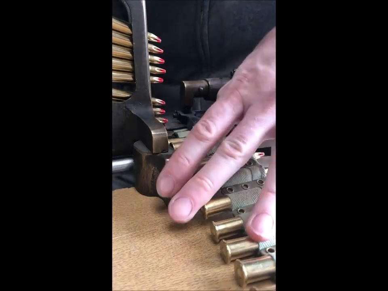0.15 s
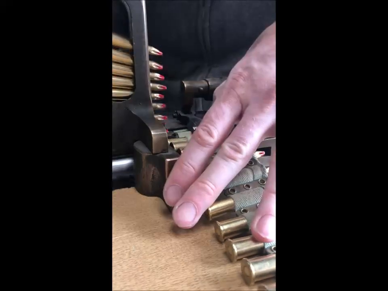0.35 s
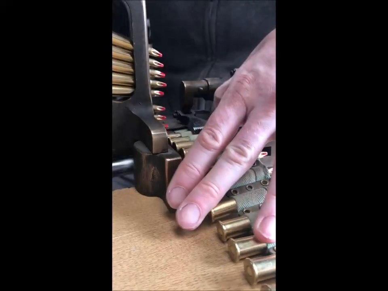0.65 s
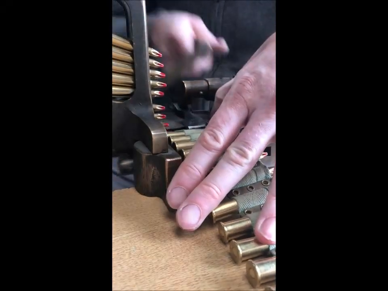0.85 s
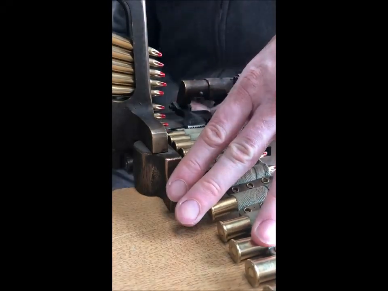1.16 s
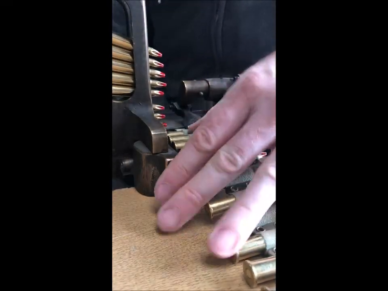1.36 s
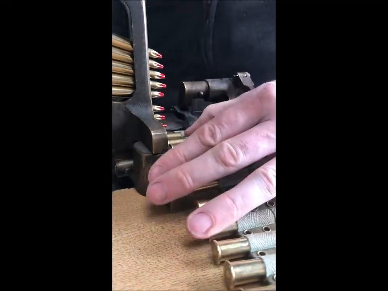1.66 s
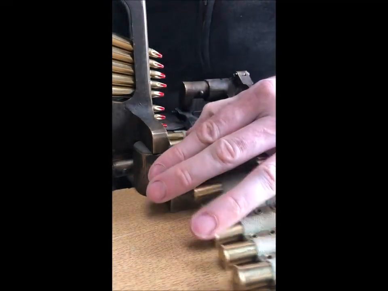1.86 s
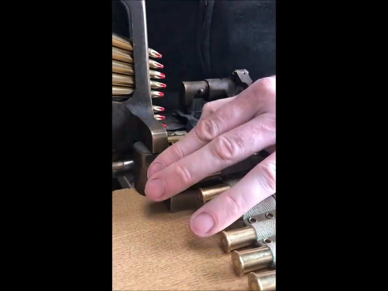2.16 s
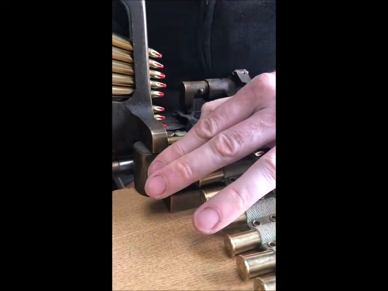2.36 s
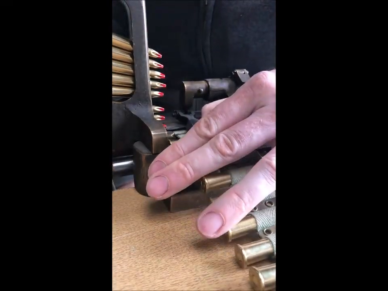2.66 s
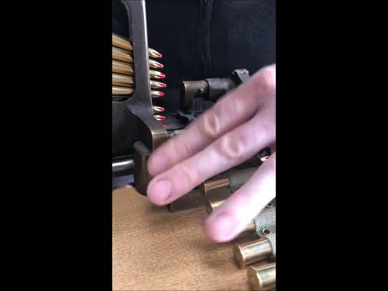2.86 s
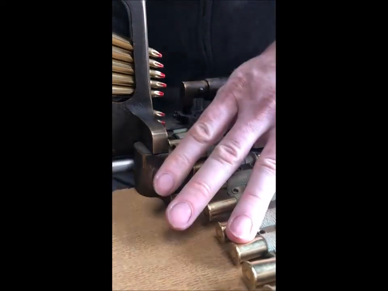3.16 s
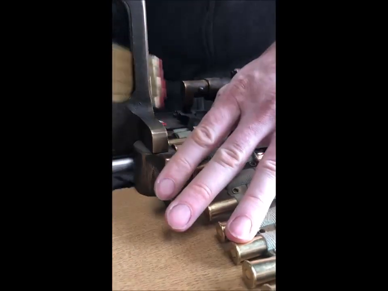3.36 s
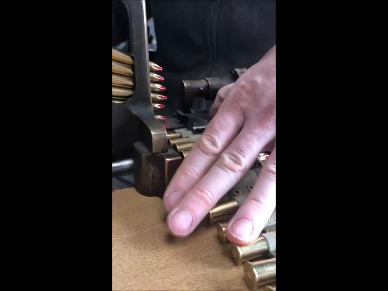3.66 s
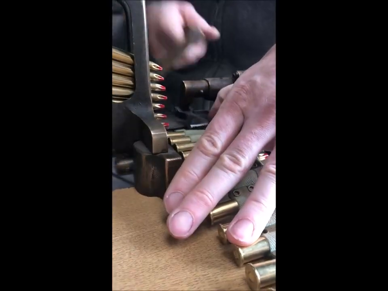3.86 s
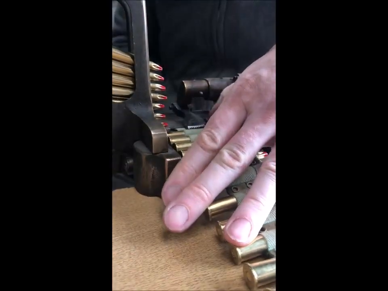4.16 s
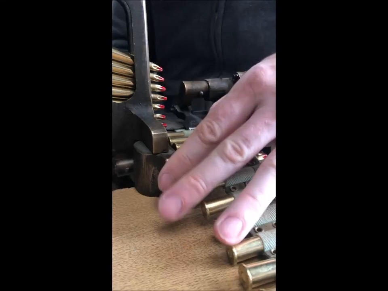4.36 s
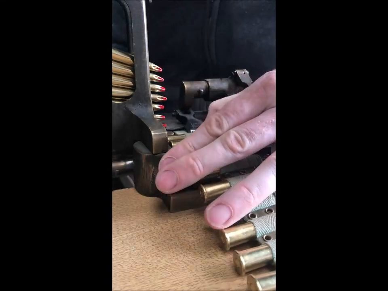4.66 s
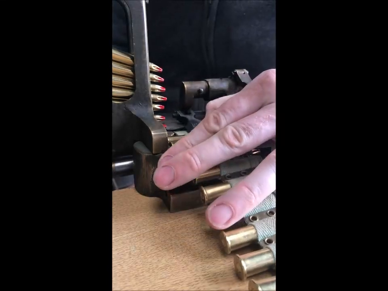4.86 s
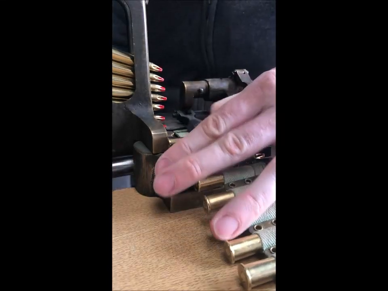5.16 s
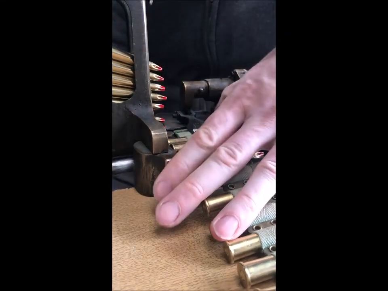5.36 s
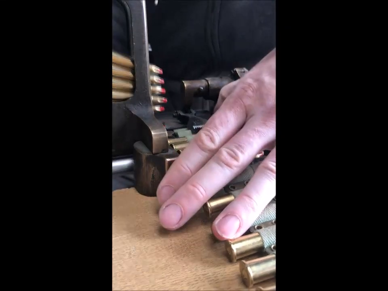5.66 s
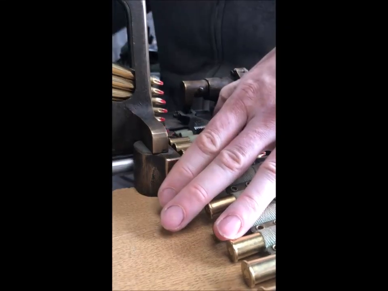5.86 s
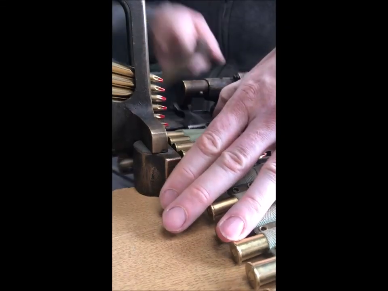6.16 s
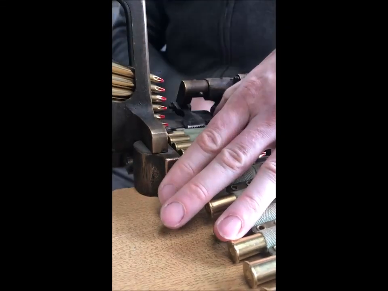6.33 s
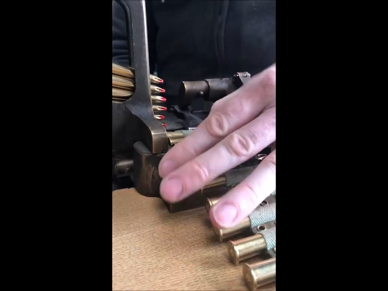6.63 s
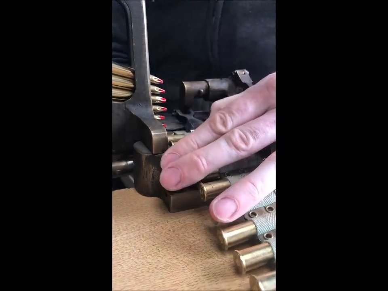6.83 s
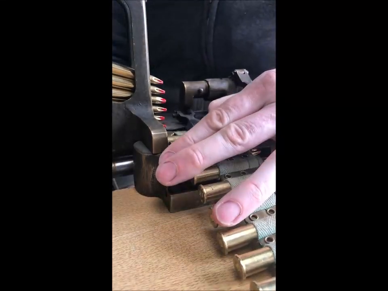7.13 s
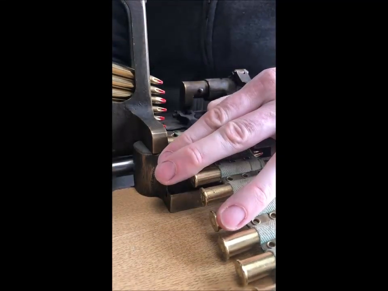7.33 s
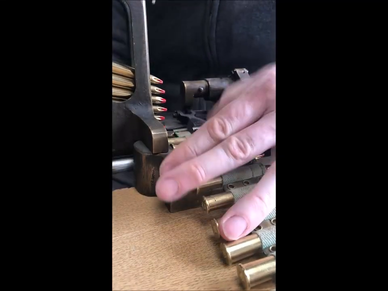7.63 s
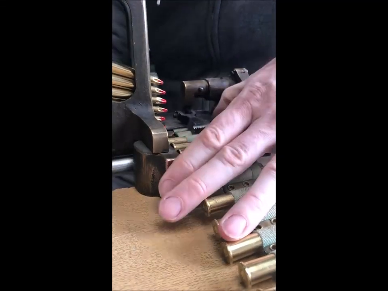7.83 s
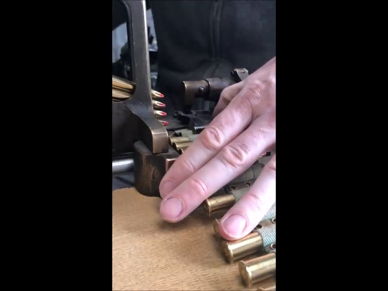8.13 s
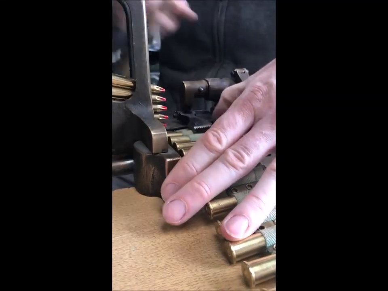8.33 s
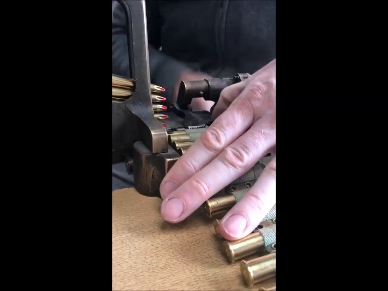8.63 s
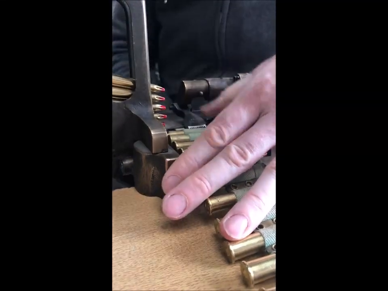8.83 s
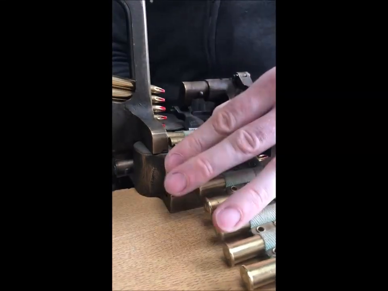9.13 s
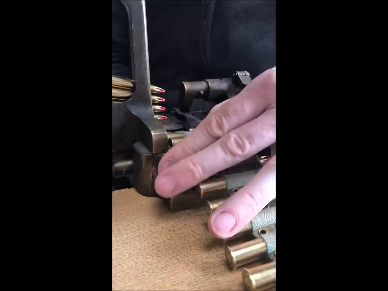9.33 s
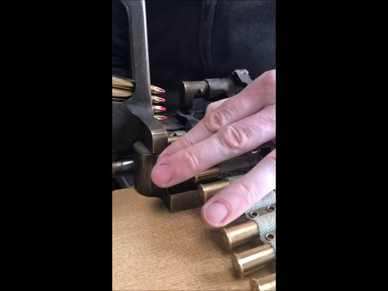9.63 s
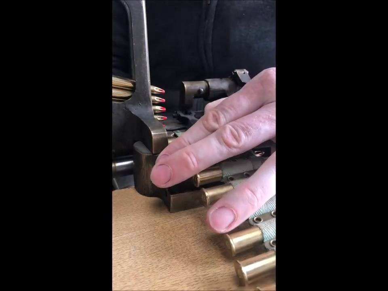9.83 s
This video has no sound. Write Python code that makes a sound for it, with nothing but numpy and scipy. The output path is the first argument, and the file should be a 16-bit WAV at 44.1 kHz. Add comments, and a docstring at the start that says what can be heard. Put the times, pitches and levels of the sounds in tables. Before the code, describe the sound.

A phone lying close on the shaking table picks up four uneven crank turns. Each begins with a grip and a steel click, then a bright cascade of brass clinks, a grinding rattle, and a hard dry metallic latch. Belt taps, brief canvas rubs and dull wood knocks trail off into near silence. Small room, short dull reflections, soft low background hush.

```python
"""Hand-cranked cartridge loader on wood

Small room, loader clamped to a wooden table, a phone lying close by on the shaking top.
Every turn of the crank pushes brass cartridges into a canvas belt: steel pawls snap, cases clink and drop
down the chute, the filled belt taps and drags on the wood. Noise shaped as contact drives resonances
of brass, steel, belt and table; decaying sines add the separate blows; filtered noise is the hush."""
import sys
import numpy as np
from scipy import signal
from scipy.fft import rfft, irfft, next_fast_len
from scipy.io import wavfile

SR = 44100
rng = np.random.default_rng(int(sys.argv[2]) if len(sys.argv) > 2 else 0)


def inscribe(sig):
    """Save sig as 16-bit PCM at rate SR to the path in sys.argv[1].

    A 1-D sig is mono; a 2-D sig holds one channel per row.
    Samples are clipped to [-1, 1] before scaling.
    """
    pcm = np.round(np.clip(np.atleast_2d(sig).T, -1, 1) * 32767)
    wavfile.write(sys.argv[1], SR, pcm.astype(np.int16))


N = 440559
TIME = np.arange(N) / SR  # s

# All levels in the tables are relative; the layers and the microphone weight them further.
# hush of room and microphone, shape of its spectrum: (frequency [Hz], level [dB])
HUSH_SPECTRUM = [(24, -28.5), (40, 3.5), (185, -4.5), (467, -18.5), (1210, -20.5), (2910, -28.5),
                 (12100, -38), (16000, -49.5)]
# resonances of the table top: (frequency [Hz], width [Hz], level [dB])
TABLE_MODES = [(79, 27, 2.5), (144.6, 16, 1), (213, 26, -4), (331, 43, -2), (404, 40, -12.5),
               (714, 260, -10.5)]
# knocks into the table top: (time [s], level [dB], pitch of the blow [Hz])
KNOCKS = [(0.209, -29, 87), (0.365, -24, 354.8), (0.685, -20, 323), (1.207, -19.5, 207), (1.883, -25, 72),
          (2.553, -27, 330), (3.16, -23.5, 87), (3.684, -23, 154), (4.198, -15, 153), (4.373, -27.5, 364),
          (5.288, -29.5, 330), (5.669, -23, 74.4), (6.031, -21.5, 130), (6.418, -17, 215), (6.581, -21, 73),
          (8.258, -24.5, 134.5), (8.792, -15, 213), (8.954, -28.5, 202), (9.087, -24, 134),
          (9.159, -31.5, 153), (9.492, -32, 152.4)]
# resonances of belt, wood and frame: (frequency [Hz], width [Hz], level [dB])
BELT_MODES = [(650, 400, -4), (950, 160, -2), (1240, 110, 0), (1750, 300, -4), (2280, 200, -2)]
# belt and frame tap the wood: (time [s], level [dB], pitch of the tap [Hz])
TAPS = [(0.135, -29.5, 1900), (0.376, -19, 2160), (0.571, -26, 1870), (0.677, -32, 685),
        (1.201, -32.5, 787), (1.314, -31.5, 1300), (1.388, -11.5, 1140), (1.447, -40.5, 883),
        (1.867, -25.5, 1600), (2.542, -32, 1260), (3.026, -30.5, 1175), (3.295, -33, 1940),
        (3.688, -26, 1930), (4.198, -25, 760), (4.365, -33.5, 607), (5.252, -23, 1259), (5.29, -22, 1180),
        (6.014, -32, 1215), (6.421, -26, 750), (6.573, -25.5, 880), (7.495, -34, 814), (7.599, -23, 1160),
        (7.83, -26.5, 1830), (8.255, -23.5, 1890), (8.787, -27, 1563), (8.943, -30.5, 902),
        (9.089, -26, 698), (9.179, -33.5, 1110), (9.266, -41, 1030), (9.287, -34, 973), (9.482, -36, 1504)]
# the belt slides over the wood: (middle [s], quarter of its length [s], level [dB])
RUBS = [(1.466, 0.034, -42.5), (1.585, 0.013, -50), (1.957, 0.03, -45.5), (2.591, 0.032, -50),
        (4.393, 0.035, -47.5), (4.959, 0.05, -49), (6.81, 0.068, -54.5)]
# resonances of the clamped steel: (frequency [Hz], width [Hz], level [dB])
STEEL_MODES = [(2850, 530, -2), (4250, 500, 1.5), (5440, 640, 0), (6570, 660, 2), (8400, 300, -5.5),
               (9700, 220, -5), (12100, 880, -5), (13330, 3000, -3)]
# snaps of the steel pawls and slide: (time [s], level [dB], pitch of the snap [Hz])
SNAPS = [(.8815, -22.5, 5330), (6.222, -25, 6370), (8.47, -22, 4640), (0.1373, -12.5, 11800),
         (0.306, -23, 6340), (0.676, -14, 5340), (0.855, -20.5, 4740), (0.9014, -3, 4120),
         (1.2063, -17.5, 4200), (1.213, -11.5, 12650), (1.2915, -39, 4530), (1.3106, -23, 6910),
         (1.4182, -27, 2780), (1.5444, -33, 2350), (1.5788, -32, 2300), (1.677, -41, 2430),
         (1.7215, -42, 3730), (1.8753, -15.5, 6060), (1.8847, -15.5, 6050), (1.956, -29, 5350),
         (2.5439, -27, 4120), (3.055, -29, 7220), (3.133, -25, 6400), (3.3007, -17.5, 4160),
         (3.5668, -17.5, 5000), (3.8526, -26.5, 6240), (3.908, -25, 5000), (3.9628, -6, 4180),
         (4.1722, -31, 3130), (4.204, -12, 6580), (4.251, -29, 4180), (4.2745, -20.5, 2800),
         (4.344, -28, 2710), (4.366, -24.5, 3250), (4.38, -26.5, 6590), (5.2472, -27, 2230),
         (5.449, -21.5, 4570), (5.6585, -10, 12840), (5.677, -9, 6470), (5.9067, -26, 6520),
         (6.1918, -20, 6960), (6.2422, -2.5, 3970), (6.2486, -5.5, 6200), (6.4178, -16.5, 6600),
         (6.5116, -11, 6670), (6.554, -22.5, 2690), (6.6234, -29, 9830), (7.2386, -36, 2210),
         (7.3445, -36, 2370), (7.444, -34, 2440), (7.5762, -28, 6700), (7.8353, -11, 12700),
         (7.885, -7.5, 6960), (7.9014, -9.5, 6870), (8.4962, -12, 4200), (8.7693, -30.5, 4580),
         (8.7967, -10, 6740), (8.9434, -23, 2700), (8.9845, -37, 4390), (9.0868, -25.5, 6240),
         (9.1537, -19, 3740), (9.2537, -40.5, 6370), (9.3566, -37.5, 3640), (9.4566, -40.5, 3180),
         (9.4818, -36.5, 2450)]
# ringing modes of a brass case: (frequency [Hz], level [dB])
BRASS_MODES = [(1280, -18), (3650, -16), (4555, -10), (4835, -11), (6293, -8), (6480, -1), (6998, -8),
               (8213, -12), (9270, -9), (9455, -7), (11020, -13), (12490, -8), (12565, -4), (13695, -12),
               (14805, -13), (15180, -8), (15470, -8)]
# cases in the stack strike each other: (time [s], level [dB])
CLINKS = [(0.321, -14), (0.531, -11), (0.559, -17), (0.573, -12), (0.612, -16), (0.634, -17), (0.6447, -22),
          (0.6871, -11), (3.1579, -22), (3.3338, -21.5), (3.3617, -15.5), (3.387, -21), (3.406, -16.5),
          (3.579, -11.5), (3.599, -10), (3.6248, -16), (3.677, -16), (3.688, -7.5), (3.7719, -18.5),
          (5.726, -21), (5.9261, -13.5), (5.939, -12), (5.981, -17), (6.014, -22.5), (6.035, -19),
          (6.0477, -9), (6.116, -17), (6.144, -18.5), (6.4264, -17), (7.939, -25), (7.9858, -10),
          (8.1148, -17), (8.1579, -14), (8.186, -18), (8.199, -17), (8.21, -17), (8.228, -14.5),
          (8.2686, -14.5), (8.332, -25)]
# a case drops onto the stack and rings freely:
# (time [s], level [dB], t60 of the chatter [s], push on the bending modes against the rest [dB])
DROPS = [(0.352, -12.5, 0.071, -14), (0.3651, -2, 0.087, -13), (0.3799, 1.5, 0.037, -7.5),
         (0.3982, -9.5, 0.084, -9), (0.4168, -11.5, 0.07, -12), (3.4407, -2, 0.13, -16.5),
         (3.4576, -7.5, 0.053, -10), (3.4918, -10.5, 0.069, -12), (5.7699, -3, 0.028, 5.5),
         (5.7818, -7.5, 0.078, 7), (5.801, -10.5, 0.09, -17), (7.995, 0.5, 0.027, 4),
         (8.001, -9, 0.21, -17)]
# one row per turn of the crank: (hand grips belt [s], load starts [s], loudest rattle [s], before the
# latch or after it, faint stir [s] and low shake [s], in either order, effort [dB])
TURNS = [(-0.1, 0.258, 0.74, 1.28, 0.9, 4), (3.054, 3.135, 3.8, 4.51, 4.45, -0.5),
         (5.3, 5.623, 6.0, 5.9, 6.5, 5.5), (7.23, 7.838, 9.2, 8.8, 9.15, 2.5)]
# the latch goes, once per turn: (time [s])
LATCH_S = [0.893, 3.9547, 6.2319, 8.4919]

# stages of every turn, before its effort: (brass rattle [dB], belt drag [dB], table shake [dB])
IDLE, GRIP, LOAD, LOUDEST = (-73.5, -78.5, -57.5), (-55.5, -56, -46.5), (-52, -53.5, -37.5), (-40, -51, -40.5)
STRAIN, STIR, LOW_SHAKE = (-46.5, -44, -31.5), (-56, -59.5, -48.5), (-66, -68, -43)
# seconds before the grip, before the latch, after the latch, after the low shake
REACH_S, STRAIN_S, REST_S, FADE_S = .1, .08, .13, .1
PULL_S = 0.012  # the load builds up this long
SLIDE_DB = (-1, 0.5, -3.5)  # what a slide adds to rattle, drag and shake, against its own level
LATCH_SNAP, LATCH_TAP = (0, 6200), (-15, 1600)  # the latch on steel and on wood: (level [dB], pitch [Hz])
# loss per octave between the pitch of a blow and a mode
KNOCK_SLOPE_DB, TAP_SLOPE_DB, SNAP_SLOPE_DB = 12, 4.5, 0.5
JOSTLE_DB = 3.2  # spread of the loose contacts between cases
BEND_HZ = 4000  # up to here the whole case bends
BRASS_T60_S, STACK_DAMPING = 0.08, 1.5  # a case touching its neighbours rings this many times shorter
HUSH_DB = -49.5  # rms of the hush before its treble stirs
ROOM_DB, ROOM_T60_S, ROOM_DULL_HZ = -14.5, 0.23, 4650
LOW_HZ, TOP_HZ = 46.4, 16000  # range of the phone


def undb(db):
    """Amplitude for a level in dB."""
    return np.exp(np.asarray(db) * np.log(10) / 20)


def level(x, db):
    """Scale a signal to an rms level in dB."""
    return x * undb(db) / np.sqrt(np.mean(x ** 2))


def flicker(spread_db, rate):
    """A gain that wanders between random levels, rate a second."""
    points = undb(spread_db * rng.standard_normal(int(rate * N / SR) + 2))
    return np.interp(TIME * rate, np.arange(len(points)), points)


def force(when, db, t60):
    """Envelope of contact: a jump at each blow that fades in its own t60, held to 2-300 ms."""
    out = np.zeros(N + SR)
    for s, size, fade in np.broadcast(when, undb(db), np.clip(t60, .002, .3)):
        t = TIME[:int(fade * SR)]
        start = int(s * SR)
        out[start:start + len(t)] += size * np.exp(-np.log(1000) * t / fade)
    return out[:N]


def jostle(size_db, t60, count):
    """Many faint contacts and a few strong ones at random moments; rms 1."""
    moments = rng.random(count) * N / SR
    sizes_db = size_db * rng.exponential(size=count)
    return level(force(moments, sizes_db, t60), 0)


def body(modes, pushes):
    """Rough contact noise rings each (Hz, width, dB) mode; a steady push of 1 gives rms near 1."""
    total = np.sqrt(sum(undb(2 * db) for _, _, db in modes))
    rough = rng.standard_normal(2 * N)
    out = 0
    for (hz, width, db), push in zip(modes, pushes):
        start = rng.integers(N)  # another stretch of noise for each mode
        contact = push * rough[start:start + N] + 1e-12
        ring = signal.lfilter(*signal.iirpeak(hz, hz / width, SR), contact)
        # a narrow mode passes less noise, so it is raised
        out = out + undb(db) / total * np.sqrt(SR / (np.pi * width)) * ring
    return out


def ping(when, db, hz, t60, rise):
    """Clean sine rings: each blow swells with time constant rise (s) and dies in t60, held to 2-300 ms."""
    out = np.zeros(N + SR)
    for s, size, f, fade in np.broadcast(when, undb(db), hz, np.clip(t60, .002, .3)):
        t = TIME[:int(fade * SR)]
        start = int(s * SR)
        swell = 1 - np.exp(-t / rise)
        decay = np.exp(-np.log(1000) * t / fade)
        out[start:start + len(t)] += size * np.sin(2 * np.pi * f * t) * swell * decay
    return out[:N]


def struck(modes, when, db, scatter_db, rise, detune):
    """Every blow rings all modes; the spot it lands on shifts their shares and pitch a little."""
    # db holds blows x modes, or one column that serves every mode
    hz, width, mode_db = np.transpose(modes)
    chance = rng.standard_normal((len(when), 2, len(modes)))
    share_db = db + mode_db + scatter_db * chance[:, 0]
    pitch = hz * (1 + detune * chance[:, 1])
    t60 = np.log(1000) / (np.pi * width)
    return ping(when[:, None], share_db, pitch, t60, rise)


def reach(db, modes, blow_hz, slope_db):
    """Level of each blow in each mode: it falls with the octaves between their pitches."""
    octaves = abs(np.log2(np.transpose(modes)[0] / blow_hz[:, None]))
    return db[:, None] - slope_db * octaves


def with_latch(blows, latch):
    """Columns of a table of blows, with one more row for the latch of each turn."""
    return np.transpose(list(blows) + [(s, *latch) for s in LATCH_S])


def slides():
    """Pressure of the belt on the wood: up and down once for each slide."""
    return sum(np.interp(TIME, (s - 2 * quarter, s, s + 2 * quarter), (0, undb(db), 0))
               for s, quarter, db in RUBS)


def work():
    """Rattle, drag and shake in dB: each turn times and orders the stages its own way; slides stir all."""
    rows = []
    for (grip, load, loudest, stir, low_shake, effort_db), latch in zip(TURNS, LATCH_S):
        stages = [(grip - REACH_S, IDLE), (grip, GRIP), (load - PULL_S, GRIP), (load, LOAD),
                  (loudest, LOUDEST), (latch - STRAIN_S, STRAIN), (latch + REST_S, IDLE),
                  (stir, STIR), (low_shake, LOW_SHAKE), (low_shake + FADE_S, IDLE)]
        rows += [(s, *(np.array(db) + effort_db)) for s, db in stages]
    s, *columns = np.transpose(sorted(rows))
    slide = slides()
    return [20 * np.log10(undb(np.interp(TIME, s, column)) + undb(db) * slide)
            for column, db in zip(columns, SLIDE_DB)]


def air():
    """Shaped noise, the hush of room and microphone; its treble stirs softly with the rustle of cloth."""
    hz, db = np.transpose(HUSH_SPECTRUM)
    size = next_fast_len(N)
    bins_hz = np.fft.rfftfreq(size, 1 / SR)
    shape = undb(np.interp(np.log(bins_hz + 1), np.log(hz), db))
    noise = irfft(rfft(rng.standard_normal(size)) * shape, size)[:N]
    hush = level(noise, HUSH_DB)
    low = signal.filtfilt(*signal.butter(1, 700, fs=SR), hush)
    return low + (hush - low) * flicker(1.5, 4) * flicker(2.0, 22)


def room(x):
    """Reflections of a small room: a dense, dull noise tail that swells over a few milliseconds."""
    t = TIME[:SR // 2]
    envelope = np.exp(-np.log(1000) * t / ROOM_T60_S) * (1 - np.exp(-t / 0.0027))
    tail = rng.standard_normal(len(t)) * envelope
    tail = signal.lfilter(*signal.butter(1, ROOM_DULL_HZ, fs=SR), tail)
    return signal.fftconvolve(x, undb(ROOM_DB) * tail / np.sqrt(np.sum(tail ** 2)))[:N]


def table(shake_db):
    """Grind and small bumps shake the top; a knock feeds mostly the modes near its own pitch."""
    when, db, blow_hz = np.transpose(KNOCKS)
    reach_db = reach(db, TABLE_MODES, blow_hz, KNOCK_SLOPE_DB)
    shake = undb(shake_db) * (.4 + .8 * jostle(2.2, .08, count=1100))  # steady grind + bumps
    pushes = (force(when, mode_db + 4, 0.19) + shake * flicker(1.7, 16) for mode_db in reach_db.T)
    rough = body(TABLE_MODES, pushes)
    return rough + struck(TABLE_MODES, when, reach_db - 4.5, 1.7, .004, detune=.015)


def belt(drag_db):
    """Taps ring wood and frame over grainy canvas drag, each with its own note; slides sing in two modes."""
    when, db, tap_hz = with_latch(TAPS, LATCH_TAP)
    drag = undb(drag_db) * jostle(2.5, 0.03, count=2500)
    reach_db = reach(db, BELT_MODES, tap_hz, TAP_SLOPE_DB)
    knocks_and_drag = body(BELT_MODES, (force(when, mode_db + 1.5, 0.024) + drag for mode_db in reach_db.T))
    song = body(BELT_MODES[2::2], (slides() * undb(share_db) * flicker(4.5, 90) for share_db in (-4, 4)))
    rough = signal.lfilter(*signal.butter(2, 3200, fs=SR), knocks_and_drag + song)
    notes = ping(when, db - 1.5, tap_hz, .02, .0006)
    return rough + notes + struck(BELT_MODES, when, db[:, None] - 4, 2.5, .0003, detune=.08)


def pawls():
    """Dry snaps of clamped steel: each has a short note, scrapes the modes and rings them."""
    when, db, snap_hz = with_latch(SNAPS, LATCH_SNAP)
    hz = np.transpose(STEEL_MODES)[0]
    reach_db = reach(db, STEEL_MODES, snap_hz, SNAP_SLOPE_DB)
    # the scrape's treble dies first; two narrow high modes ring longest
    scrapes = body(STEEL_MODES, (force(when, mode_db - 7.5, 70 / f ** 0.96) * flicker(2.3, 25)
                                 for f, mode_db in zip(hz, reach_db.T)))
    rings = struck(STEEL_MODES, when, reach_db - 5, 3.0, 0.00027, detune=0.033)
    return scrapes + rings + ping(when, db - 1.5, snap_hz, 0.014, 0.00015)


def case_modes(damping):
    """Modes of a brass case as (Hz, width, dB): damping widens them, so they ring shorter."""
    width = damping * np.log(1000) / (np.pi * BRASS_T60_S)
    return [(hz, width, db) for hz, db in BRASS_MODES]


def brass(push, low_push, damping, scatter_db):
    """Contact rings the case, its bending modes pushed apart, and cracks; the favoured modes wander."""
    modes = case_modes(damping)
    rings = body(modes, ((push if hz > BEND_HZ else low_push) * flicker(scatter_db, 30) for hz, _, _ in modes))
    crack = (push + 1e-12) * rng.standard_normal(N)
    return rings + undb(-4.0) * signal.lfilter(*signal.butter(1, 2000, "high", fs=SR), crack)


def cases(rattle_db):
    """Drops ring out; clinks and the jostle of the stack are damped and tick on the steel chute."""
    chatter = .5 + .6 * jostle(2.5, .002, count=9000)  # drops and clinks stutter
    when, db, t60, bend_db = np.transpose(DROPS)
    drop_push = chatter * force(when, db, t60)
    bend_push = chatter * force(when, db + bend_db, t60)
    drops = brass(drop_push, bend_push, damping=1, scatter_db=4.0)

    clink_s, clink_db = np.transpose(CLINKS)
    clinks = chatter * force(clink_s, clink_db, 0.035)
    loose = undb(rattle_db) * jostle(JOSTLE_DB, 0.01, count=3000)
    # the harder the stack is shaken, the more of it reaches the brass rather than the chute
    shaken = np.clip(undb(rattle_db + 49.0), 0, 1)
    stack_push = clinks + shaken * loose
    stack = brass(stack_push, undb(-4.0) * stack_push, STACK_DAMPING, scatter_db=6.0)

    chute_push = undb(-4) * clinks + undb(-3.5) * loose
    chute = body(STEEL_MODES, [chute_push] * len(STEEL_MODES))
    ticks = struck(STEEL_MODES, clink_s, clink_db[:, None] - 10.5, 6.7, .0004, detune=.05)
    clink_modes = case_modes(STACK_DAMPING)[2:]  # without the two lowest
    clink_rings = struck(clink_modes, clink_s, clink_db[:, None] - 11.5, 7.7, 0.00053, detune=.006)
    return undb(-2) * drops + undb(-12.0) * stack + clink_rings + chute + ticks


def scene():
    """All of the machine, its echo in the room, the table and the hush."""
    rattle_db, drag_db, shake_db = work()
    machine = cases(rattle_db) + pawls() + belt(drag_db)
    return (machine + room(machine) + table(shake_db) + air())[None]


def record(dry):
    """The phone drops the deepest bass, rounds the loudest peaks and cuts the top."""
    x = signal.lfilter(*signal.butter(2, LOW_HZ, "high", fs=SR), dry)
    rounded = np.tanh(0.55 * x) / 0.85
    return signal.sosfilt(signal.ellip(8, .2, 70, TOP_HZ, fs=SR, output="sos"), rounded)


dry = scene()
out = record(dry)
inscribe(out)
```